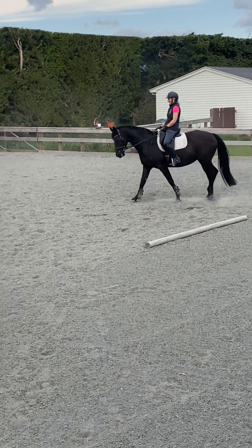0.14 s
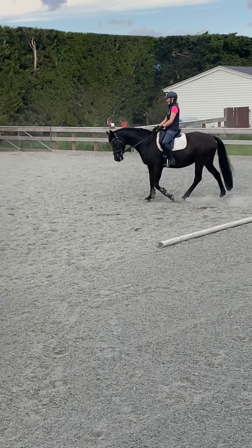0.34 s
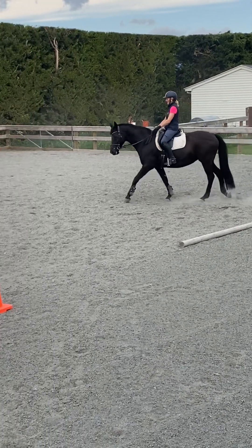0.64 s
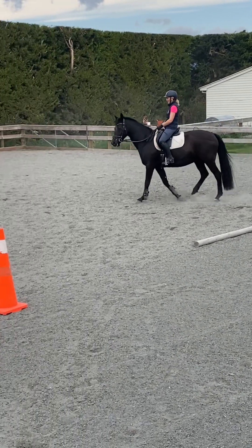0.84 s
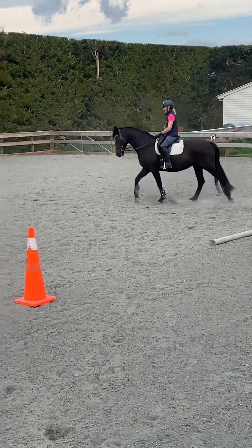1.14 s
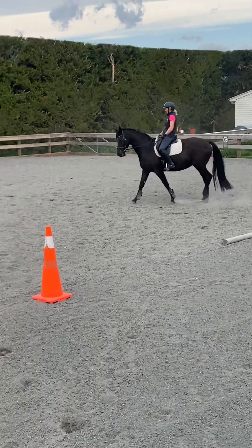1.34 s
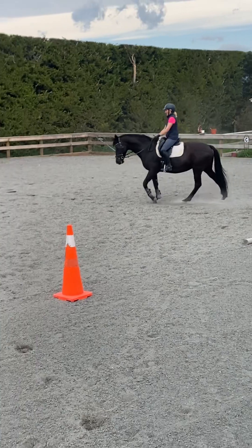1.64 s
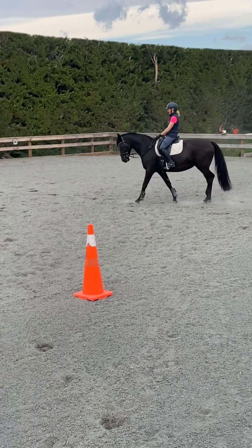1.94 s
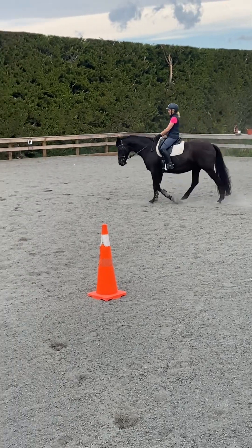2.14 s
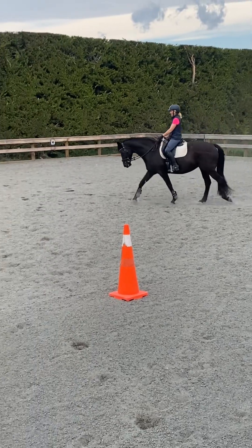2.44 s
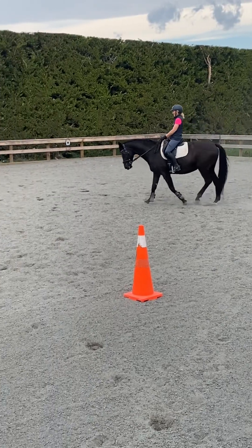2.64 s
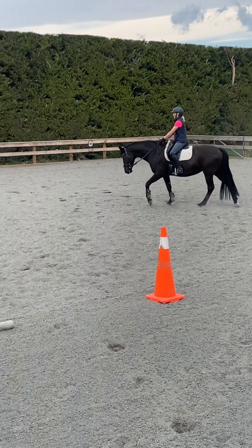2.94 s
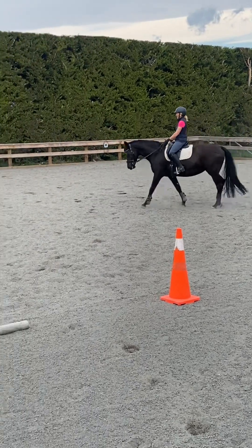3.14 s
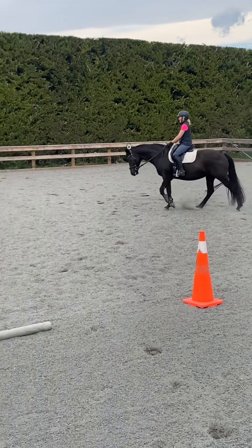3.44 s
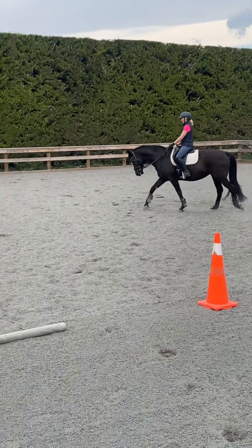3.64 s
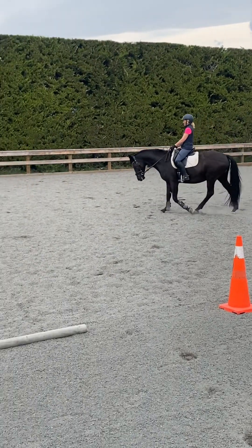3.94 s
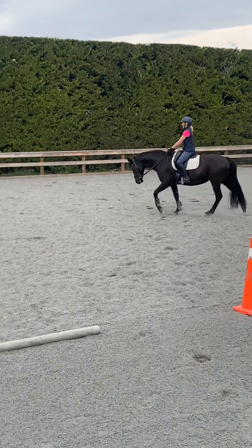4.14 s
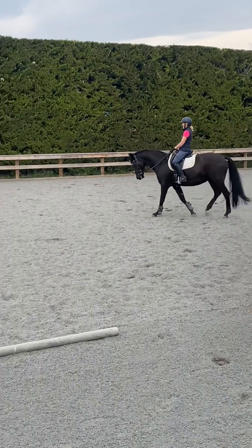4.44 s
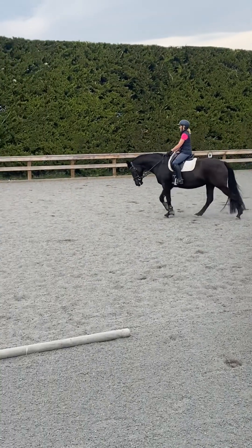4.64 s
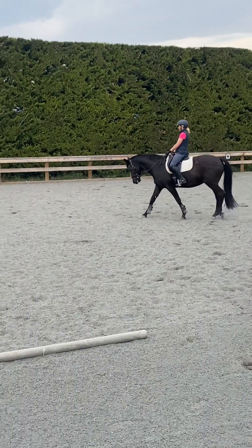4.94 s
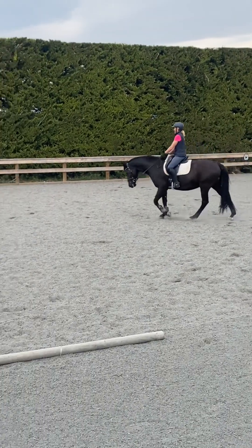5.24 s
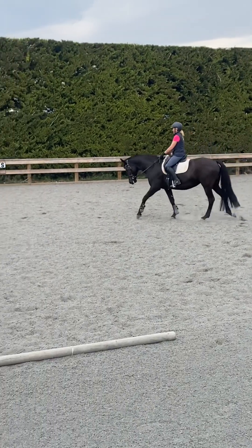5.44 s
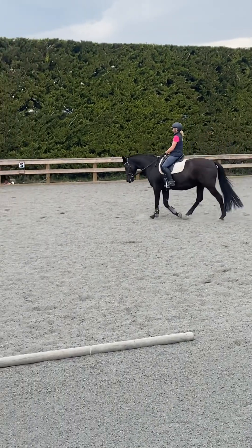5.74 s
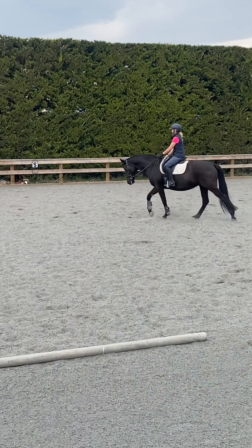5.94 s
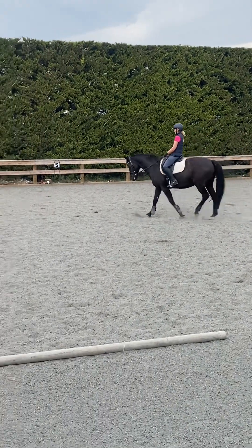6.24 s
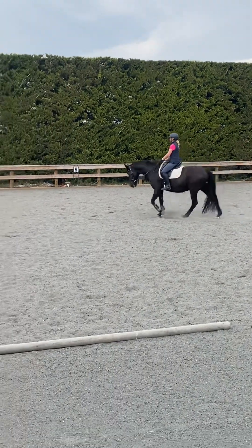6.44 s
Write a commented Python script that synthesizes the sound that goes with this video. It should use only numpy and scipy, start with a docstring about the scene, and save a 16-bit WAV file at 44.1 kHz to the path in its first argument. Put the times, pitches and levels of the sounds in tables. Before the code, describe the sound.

Outdoors at a sand arena, a soft uneven air floor carries a faint, wavering low drone. From 0 to about 1.7 seconds a hoarse, buzzy mid-pitched call swells and fades, while small birds chirp above a distant high twitter. A horse trots some way off: light, irregular hoof ticks within short grainy scuffs, with tiny touches of grit and tack throughout. From 1.8 to 4.1 seconds wind buffets the microphone in deep rumbles and dull falling thumps, strongest around 2.5 to 2.7; a low bending knock comes at 2.25. Bird notes get clearer, with a falling trill near 3.4 and bright chirps around 3.7. A hard clack lands at 3.97. It is calmer until 5.1, with a small knock at 4.7 and a double clack near 5.3. Gusts and heavy thumps return from 5.5 to 6.3, with a hollow plop at 5.95, then birds and quiet air to 6.6.

```python
"""A sand arena in the open, with a hedge: a horse trots some way off.
Hoof falls are ticks inside scuffs of short ringing grains; other ticks of grit and tack are dying noise bursts.
Birds are gliding sine whistles, far ones blur into a wash, and a buzzy call of noise-blurred tones opens.
Gusts buffet the two-port microphone as low noise, with dull thumps of falling pitch.
Clacks, bending knocks, hollow plops, a low drone and an unsteady air floor complete the scene."""
import sys
import numpy as np
from scipy import signal
from scipy.fft import rfft, irfft
from scipy.io import wavfile
from scipy.ndimage import uniform_filter1d

SR = 44100
rng = np.random.default_rng(int(sys.argv[2]) if len(sys.argv) > 2 else 0)


def put_to_file(sound):
    """Save the sound as 16-bit audio at rate SR, in the file named by the first command-line argument."""
    columns = np.atleast_2d(sound).T  # one column per channel
    safe = np.clip(columns, -1, 1)
    whole_steps = np.round(safe * 32767)
    wavfile.write(sys.argv[1], SR, whole_steps.astype(np.int16))


N = 291060
TIME, FREQ = np.arange(N) / SR, np.fft.rfftfreq(N, 1 / SR)  # s, Hz
ALONG = np.linspace(0, 1, 64)  # position along a syllable, start to end
# Hoof falls. Each row: start in seconds, relative tick peak in dB, scuff level in dB, scuff length in seconds
STEPS = [(0.3216, -52, -72, .068), (0.975, -58, -66.5, .07), (1.391, -47, -67, .11),
         (1.544, -48.5, -68, .05), (1.7573, -50, -65, .11), (2.1329, -52.5, -70, .083),
         (2.6382, -53.5, -70, .072), (2.733, -49, -69, .07), (2.9164, -56, -78, .15),
         (3.2485, -49, -65, .05), (3.361, -48, -67, .1), (3.8005, -47, -76, .15), (4.5452, -55, -72, .05),
         (5.05, -60, -73, .06), (5.16, -60, -68, .045), (5.2789, -47, -72.5, .23), (5.756, -52, -73, .03),
         (6.2496, -53, -69, .06), (6.35, -60, -66, .11)]


def amp(db):
    """Decibels to gain: twenty decibels are a factor of ten in amplitude."""
    return 10 ** (np.asarray(db) / 20)


def unit(x):
    """Normalisation by mean power: scales to an rms of one."""
    return x / np.sqrt(np.mean(x ** 2) + 1e-20)


def curve(rows, axis=1):
    """Linear interpolation of one column of a time table at every sample."""
    rows = np.asarray(rows)
    return np.interp(TIME, rows[:, 0], rows[:, axis])


def over_hz(points, hz=FREQ):
    """Interpolation of a spectrum on a log-frequency axis."""
    f, value = np.transpose(points)
    return np.interp(np.log(hz + 1), np.log(f + 1), value)


def colour(x, points):
    """Zero-phase filtering: multiplies the spectrum by a gain curve in dB."""
    gain = amp(over_hz(points, np.fft.rfftfreq(len(x), 1 / SR)))
    return irfft(rfft(x) * gain, len(x))


def noise(points):
    """White noise shaped by a spectrum, with an rms of one."""
    return unit(colour(rng.standard_normal(N), points))


def wander(hz):
    """Gaussian low-pass noise: slow random motion up to about hz."""
    return unit(irfft(rfft(rng.standard_normal(N)) * np.exp(-(FREQ / hz) ** 2), N))


def steadied(x, size):
    """Division by the local rms, over size samples, evens out the chance swells of a noise."""
    power = uniform_filter1d(uniform_filter1d(abs(x) ** 2, size), size)
    return x / np.sqrt(power + 1e-4)


def patchy(x, depth_db, size, count, order=256):
    """Random time-frequency gain: patches size frames long and count bins wide, in frames of order samples."""
    z = signal.stft(x, nperseg=order)[2]
    field = rng.standard_normal(z.shape)
    for _ in range(2):
        field = uniform_filter1d(uniform_filter1d(field, size, 1), count, 0)
    patched = signal.istft(z * amp(depth_db * unit(field)), nperseg=order)[1][:N]
    return unit(patched) * np.std(x)


def add(mix, s, sound):
    """Superposition: mixes a sound in at time s."""
    part = mix[max(round(s * SR), 0):][:len(sound)]
    part += sound[:len(part)]


def echoes(x, t60, delay):
    """Scattering as convolution with sparse, exponentially dying taps of rms gain one."""
    t = np.arange(SR // 2) / SR
    sparse = rng.standard_normal(len(t)) * (rng.random(len(t)) < .05)
    taps = sparse * (t > delay) * amp(-60 * t / t60)
    return signal.fftconvolve(x, taps / np.linalg.norm(taps))[:N]


def ports(x):
    """All-pass phase difference: both ports hear equal magnitudes with a phase that turns with frequency."""
    # Each row: frequency in Hz, phase in radians by which the left port leads
    phase_lead = [(0, 0), (280, 0), (450, -1.2), (690, -2.3), (1210, -3.7), (1640, -6.1), (2580, -5.3),
                  (3750, -6.0), (4570, -5.1), (4900, -3.1), (5250, -.2), (6700, .8), (8000, 1.5),
                  (10500, 2.55), (14000, 3.0)]
    half = np.exp(.5j * over_hz(phase_lead))
    return irfft(rfft(x) * np.array([half, half.conj()]), N)


def air():
    """Broadband ambient noise: the soft outdoor floor, swelling unevenly."""
    # Each row: frequency in Hz, relative density in dB per Hz
    air_spectrum = [(20, -102), (100, -101.5), (180, -99), (300, -93.5), (500, -99), (750, -101),
                    (1000, -107), (1400, -116), (2200, -115), (5000, -119), (7000, -131), (10000, -135),
                    (12500, -142), (16000, -152)]
    # Slow swell. Each row: time in seconds, relative level in dB
    air_swell = [(0, 0), (1, 0), (1.35, 2.5), (1.7, 0), (2.5, -1), (3.2, 1.5), (3.8, 1), (4.1, 3), (4.6, 1),
                 (5, -2), (5.5, .3), (6.6, 0)]
    floor = patchy(colour(rng.standard_normal(N), air_spectrum), depth_db=2.2, size=22, count=6)
    floor = patchy(floor, depth_db=2.6, size=3, count=2, order=2048)
    return floor * np.sqrt(SR / 2) * amp(curve(air_swell) - .5 + 1.3 * wander(9))


def drone():
    """Frequency and amplitude modulation: a far low tone wavers and comes and goes."""
    # Each row: time in seconds, relative level in dB
    drone_level = [(0, -73), (.4, -72), (.75, -63), (1.2, -69), (1.65, -64), (2.3, -74), (4.75, -80),
                   (4.95, -64), (5.1, -74), (5.25, -65), (5.6, -80)]
    hz = 108.7 * (1 + .0264 * wander(9))
    tone = unit(np.sin(2 * np.pi * np.cumsum(hz) / SR))
    return amp(curve(drone_level) - 2 + 2 * wander(7)) * tone


def wind(breeze_flutter_db=-76):
    """Turbulent pressure noise: gusts drive a deep rumble and a higher flutter, over a light breeze."""
    # Spectra. Each row: frequency in Hz, relative level in dB
    rumble_colour, flutter_colour = [(12, -32), (30, -9), (54, 9), (80, 2), (115, -9), (170, -20),
                                     (400, -57), (2000, -120)], [(70, -14.5), (130, 5), (200, -6), (290, -12),
                                                     (420, -32.5), (900, -53), (4000, -110)]
    # Light air between gusts. Each row: time in seconds, relative rumble level in dB
    breeze = [(0, -62), (.33, -68), (.52, -60), (.8, -69), (1.25, -74), (1.7, -69), (4.4, -70), (4.52, -61),
              (4.85, -75), (6.3, -75), (6.43, -61), (6.6, -71)]
    # One curve per gust. Each row: time in seconds, relative strength in dB
    gusts = [
        [(1.72, -62), (1.764, -51), (1.862, -58), (1.896, -40), (1.948, -57), (2.078, -46), (2.12, -62),
         (2.16, -54), (2.22, -61)],
        [(2.22, -61), (2.26, -43), (2.344, -53), (2.42, -41), (2.504, -40), (2.662, -36), (2.678, -41),
         (2.716, -41), (2.74, -60)],
        [(2.74, -61), (2.752, -66), (2.816, -42), (2.86, -40), (2.918, -44), (2.948, -42), (2.984, -44),
         (3.03, -56)],
        [(3.03, -55), (3.04, -60), (3.07, -45), (3.142, -40), (3.19, -59), (3.26, -52), (3.358, -54),
         (3.472, -68), (3.48, -74)],
        [(3.48, -78), (3.51, -50), (3.592, -57), (3.772, -53), (3.818, -43), (3.936, -63), (3.956, -48),
         (4.118, -68), (4.15, -83)],
        [(5.1, -79), (5.198, -60), (5.502, -55), (5.542, -39), (5.6, -46), (5.622, -42), (5.666, -42),
         (5.712, -54), (5.76, -47)],
        [(5.76, -48), (5.836, -50), (5.862, -41), (6.004, -37), (6.03, -46), (6.108, -50), (6.128, -43),
         (6.254, -49), (6.32, -83)],
    ]
    # One value per gust: flutter against rumble in dB
    gust_flutter_db = [-15, -18, -8, -19, -11, -10, -9]
    swell = amp(2.5 * wander(12))
    rumble, flutter = amp(curve(breeze)) * swell, amp(breeze_flutter_db) * swell
    for gust, flutter_db in zip(gusts, gust_flutter_db):
        strength = amp(curve(gust)) * (TIME >= gust[0][0]) * (TIME < gust[-1][0])
        rumble = np.maximum(rumble, strength)
        flutter = np.maximum(flutter, amp(flutter_db) * strength)
    deep = rumble * steadied(noise(rumble_colour), size=1500)
    return deep + flutter * steadied(noise(flutter_colour), size=1000)


def swoop(length, start_hz, end_hz, skew=.84):
    """Falling chirp: a few cycles of pressure that slow down under a smooth window."""
    u = np.linspace(0, 1, int(length * SR))
    hz = end_hz + (start_hz - end_hz) * (1 - u) ** 2
    return np.sin(np.pi * u ** skew) ** 2 * np.sin(2 * np.pi * np.cumsum(hz) / SR)


def thumps(level_db=-1):
    """Eddy impacts: single eddies strike the microphone, and their pressure cycles slow as they pass."""
    # Each row: start in seconds, relative peak in dB, length in seconds, start and end pitch in Hz
    eddies = [(0.515, -44, .016, 344, 135), (1.878, -34.5, .034, 155, 60), (2.456, -29, .032, 105, 58),
              (2.481, -30, .02, 250, 80), (2.506, -34, .018, 200, 100), (2.538, -25.5, .055, 80, 48),
              (2.6, -26, .03, 200, 75), (2.622, -28, .028, 100, 62), (2.642, -23.5, .034, 90, 55),
              (2.692, -30, .028, 90, 55), (2.81, -32.5, .036, 110, 55), (2.84, -32, .03, 170, 65),
              (2.872, -32, .02, 240, 95), (2.897, -35, .019, 280, 110), (2.945, -34, .02, 170, 80),
              (2.992, -44, .01, 544, 210), (3.686, -42, .02, 260, 100), (3.777, -38, .022, 240, 95),
              (3.803, -37, .018, 300, 115), (3.95, -41, .03, 95, 60), (5.527, -35, .012, 400, 170),
              (5.529, -23.5, .038, 135, 56), (5.577, -33, .012, 470, 175), (5.617, -32, .026, 190, 80),
              (5.64, -35, .014, 355, 160), (5.657, -31, .015, 370, 125), (5.858, -29, .045, 90, 52),
              (5.921, -27, .013, 410, 160), (5.93, -25.5, .034, 145, 60), (5.977, -31, .014, 330, 130),
              (5.982, -22.5, .032, 110, 52), (5.999, -39, .012, 420, 230), (6.019, -42, .008, 783, 420),
              (6.054, -34, .022, 248, 95), (6.122, -37, .045, 80, 50), (6.206, -39, .019, 277, 110)]
    out = np.zeros(N)
    for s, db, length, start_hz, end_hz in eddies:
        add(out, s, amp(db + level_db) * swoop(length, start_hz, end_hz))
    return out


def plops():
    """Short tone bursts: small hollow sounds, all on one slightly falling note."""
    # Each row: start in seconds, peak in dB, length in seconds
    hollow_notes = [(0.588, -47.5, .011), (0.648, -48, .007), (1.646, -56.5, .02), (5.948, -39, .01)]
    out = np.zeros(N)
    for s, db, length in hollow_notes:
        add(out, s, amp(db) * swoop(length, start_hz=608, end_hz=500))
    return out


def pocks():
    """Dispersion-like chirp: the treble of a knock arrives first and the pitch bends into a low body."""
    # Each row: start in seconds, peak in dB, length in seconds, start pitch in Hz,
    # seconds in which the pitch halves, skew (lower peaks earlier)
    knocks = [(2.2488, -35.5, .026, 950, .0016, .85), (4.7131, -44, .012, 2500, .0008, .55)]
    out = np.zeros(N)
    for s, db, length, start_hz, halving_s, skew in knocks:
        t = np.arange(int(length * SR)) / SR
        hz = start_hz / (1 + t / halving_s)
        shape = np.sin(np.pi * (t / length) ** skew)
        add(out, s, amp(db) * shape * np.sin(2 * np.pi * np.cumsum(hz) / SR))
    return out


def syllable(length, pitches, trill=0, rasp=0, fall_per_s=0, waver=.009, flutter_db=2):
    """Frequency-modulated whistle: rasp roughens its start, a trill chops it into flicks."""
    trill_flick = 2.3  # each pulse glides this much more steeply than its note
    t = np.arange(int(max(length, .01) * SR)) / SR
    knots = np.arange(0, t[-1] + .01, .005)
    draws = rng.standard_normal((3, 80))[:, :len(knots)]
    wobble, push, hurry = (np.interp(t, knots, row) for row in draws)
    scatter = np.interp(t, np.arange(400) * .0007, rng.standard_normal(400))
    hoarse = scatter * (1 - t / t[-1]) ** 1.5
    glide = np.interp(t / t[-1], ALONG, pitches)
    hz = glide * (1 + waver * wobble + rasp * hoarse)
    shape = signal.windows.tukey(len(t), .22) * amp(flutter_db * push)
    if trill:
        beat = (np.cumsum(trill * (1 + .08 * hurry)) / SR) % 1
        flick = fall_per_s - trill_flick * np.gradient(np.log(glide)) * SR
        hz = hz * (1 + flick * (.5 - beat) / trill)
        shape = shape * np.sin(np.pi * beat) ** 6
    return unit(shape * np.sin(2 * np.pi * np.cumsum(hz) / SR))


def far_birds(count=480, flock_db=-2.5, wash_db=-7.5):
    """Incoherent superposition: many faint syllables, mostly falling, blur into a soft high wash."""
    # Each row: time in seconds, relative level in dB
    chorus_level = [(0, -73), (.85, -67.5), (1.2, -73.5), (1.7, -69.5), (2.85, -68), (3.9, -71),
                    (4.2, -67.5), (5.05, -76), (5.25, -69), (6.6, -70)]
    # Each row: frequency in Hz, relative level in dB
    chorus_colour = [(1000, -40), (1600, -15), (2100, -6), (2600, 0), (3100, 3), (4300, 3), (5300, -1),
                     (5900, -19), (7000, -47), (12000, -79)]
    song = np.zeros(N)
    for k, (when, long, high, fall, arch, loud, kind) in enumerate(rng.random((count, 7))):
        slope = (.65 * fall - .15) * (.5 - ALONG) + .22 * (arch - .5) * np.sin(np.pi * ALONG)
        hz = (2600 + 2700 * high ** 1.3) * (1 + slope)
        trill = (kind < .3) * (60 + 300 * kind)
        start = (k + 3 * when - 2) / count * N / SR
        add(song, start, amp(8 * loud) * syllable(.02 + .08 * long ** 2, hz, trill, .04 * kind))
    flock = unit(colour(song + .6 * echoes(song, t60=.2, delay=.003), chorus_colour))
    wash = patchy(noise(chorus_colour), depth_db=4, size=8, count=4)
    return amp(curve(chorus_level)) * (amp(flock_db) * flock + amp(wash_db) * wash)


def buzzy_call():
    """Narrow-band noise: gliding tones, blurred by random modulation, stand in a band of rasp."""
    # Each row: time in seconds, relative level of the rasp in dB
    buzz_level = [(0, -78), (.17, -66.5), (.33, -60.5), (.5, -58), (.68, -57.5), (.85, -57), (1.1, -63),
                  (1.33, -59), (1.55, -65.5), (1.8, -84)]
    # Each row: frequency in Hz, relative level in dB
    buzz_rasp = [(500, -30), (800, -10), (1050, 8), (1300, -2.5), (1520, -5), (1750, -4), (2080, -1.5),
                 (2300, -13), (2900, -24), (6000, -70)]
    # One curve per ridge. Each row: time in seconds, pitch in Hz, level in dB
    buzz_ridges = [
        [(.05, 1560, -86), (.18, 1590, -72), (.3, 1670, -70), (.38, 1735, -63.5), (.5, 1768, -62),
         (.6, 1765, -64), (.78, 1740, -80)],
        [(.3, 1530, -80), (.65, 1540, -73), (.8, 1530, -65), (1.05, 1490, -71), (1.22, 1505, -68),
         (1.55, 1470, -81)],
        [(.25, 2080, -82), (.55, 2080, -73), (.95, 2040, -74), (1.55, 2030, -81)],
    ]
    blur_hz = 62
    rasp = patchy(noise(buzz_rasp), depth_db=3, size=3, count=2, order=2048)
    call = amp(curve(buzz_level) - 2.3) * rasp
    for ridge in buzz_ridges:
        fuzz = steadied(wander(blur_hz) + 1j * wander(blur_hz), size=6000)
        carrier = np.exp(2j * np.pi * np.cumsum(curve(ridge)) / SR)
        tone = unit((carrier * fuzz).real)
        sounding = (TIME > ridge[0][0]) * (TIME < ridge[-1][0])
        call = call + amp(curve(ridge, axis=2)) * sounding * tone
    return call


def chirps():
    """Resonance-shaped pitch curve: a quick flick up to a top, then a fall that levels off."""
    # Each row: time of the top in seconds, tail in seconds, level in dB, top pitch in Hz,
    # mean trill pulses per second or 0
    chirp_notes = [(0.112, .045, -70, 5000, 150), (0.268, .04, -72, 4700, 130), (0.778, .065, -67, 4400, 0),
                   (1.915, .03, -71, 4100, 0), (2.032, .115, -68, 4450, 80), (3.254, .062, -59, 4600, 0),
                   (3.61, .032, -64, 5600, 0), (3.682, .048, -57, 5650, 0), (3.685, .045, -65, 6000, 140),
                   (4.279, .085, -64.5, 4350, 0), (4.622, .07, -71, 4400, 0), (5.112, .028, -69, 4600, 0),
                   (5.165, .02, -72, 4400, 130), (5.605, .065, -67, 4400, 0), (6.095, .062, -64, 4300, 0),
                   (6.137, .062, -66, 4550, 0)]
    lead_s, turn_s = .027, .016  # rise before the top, half width of the top
    tail_share = .645  # pitch toward which the fall levels off, over top pitch
    song = np.zeros(N)
    for s, tail, db, top_hz, trill in chirp_notes:
        length = lead_s + tail
        flick = 1 / (1 + ((ALONG * length - lead_s) / turn_s) ** 2)
        hz = top_hz * (tail_share + (1 - tail_share) * flick)
        chirp = syllable(length, hz, trill, rasp=.085, fall_per_s=24)
        swell = np.minimum(np.arange(len(chirp)) / SR / .03, 1)  # full just after the top
        add(song, s - lead_s, amp(db) * swell * chirp)
    return song


def slurs():
    """Decelerating glide: the pitch moves quickly at first and settles on a note."""
    # Each row: start in seconds, length in seconds, level in dB, start and end pitch in Hz
    slur_notes = [(0.17, .085, -76, 4380, 3950), (0.955, .145, -71, 3100, 2880),
                  (1.55, .17, -70.5, 4500, 3900), (1.775, .04, -73, 3450, 2850),
                  (1.86, .035, -71, 3500, 2550), (2.09, .11, -78, 5600, 5000),
                  (2.195, .04, -71, 3600, 2850), (2.26, .13, -76, 2950, 2550),
                  (2.59, .09, -77.5, 3120, 2250), (2.68, .035, -73, 3600, 1700),
                  (2.715, .1, -76, 2280, 1830), (3.16, .04, -73, 3300, 1900), (3.38, .13, -71, 3520, 3020),
                  (3.582, .012, -64, 3600, 4550), (3.765, .095, -65, 4900, 3680),
                  (3.9, .07, -75, 5650, 5250), (4.0, .15, -73, 3430, 3180), (4.68, .075, -70, 4350, 4700),
                  (4.975, .075, -71, 3650, 3150), (4.828, .042, -67, 3550, 4330),
                  (5.18, .15, -76, 3270, 2890), (5.68, .04, -73, 2900, 4150)]
    song = np.zeros(N)
    for s, length, db, start_hz, end_hz in slur_notes:
        hz = end_hz + (start_hz - end_hz) * (1 - ALONG) ** 1.8
        add(song, s, amp(db) * syllable(length, hz))
    return song


def dives():
    """Accelerating glide: notes start level and then dive or climb, some trilled."""
    # Each row: start in seconds, length in seconds, level in dB, start and end pitch in Hz,
    # mean trill pulses per second or 0
    dive_notes = [(0.015, .055, -74, 4200, 3100, 110), (0.42, .07, -69, 4300, 3700, 150),
                  (0.515, .025, -71, 4150, 3200, 0), (0.6, .022, -68, 3500, 2200, 0),
                  (0.755, .072, -65, 4900, 4050, 0), (0.885, .025, -71, 3350, 2400, 0),
                  (1.755, .045, -72, 4450, 3700, 0), (1.957, .027, -71, 6200, 5600, 75),
                  (1.992, .022, -59, 5420, 4880, 0), (2.005, .035, -70, 4800, 4200, 80),
                  (2.352, .03, -70, 4400, 3700, 0), (2.412, .033, -70, 5500, 3700, 75),
                  (2.44, .07, -67, 3720, 3800, 80), (2.505, .035, -70, 3900, 2900, 0),
                  (2.59, .11, -70, 4250, 4350, 45), (2.908, .095, -67, 3950, 2100, 55),
                  (3.022, .022, -70, 2100, 4000, 0), (3.053, .022, -62, 4300, 2500, 0),
                  (3.19, .038, -69, 3800, 4700, 0), (3.205, .045, -67, 2000, 4400, 0),
                  (3.424, .135, -61.5, 5300, 2100, 61), (4.045, .075, -72, 2900, 4300, 58),
                  (4.385, .03, -71, 3900, 2800, 0), (4.745, .085, -66, 4780, 3450, 0),
                  (5.005, .04, -69, 4580, 3980, 0), (5.72, .022, -73, 5400, 5100, 0),
                  (5.775, .055, -76, 3400, 2400, 0), (5.8, .025, -75, 6150, 5000, 0),
                  (5.845, .032, -71, 3800, 2600, 0), (5.995, .028, -71, 3800, 2600, 0),
                  (6.243, .024, -71, 3650, 2700, 0), (6.33, .032, -72, 3700, 2800, 0),
                  (6.575, .028, -69, 5300, 5300, 70)]
    song = np.zeros(N)
    for s, length, db, start_hz, end_hz, trill in dive_notes:
        hz = start_hz + (end_hz - start_hz) * ALONG ** 1.8
        add(song, s, amp(db) * syllable(length, hz, trill, rasp=.025, fall_per_s=13))
    return song


def arches():
    """Parabolic glide: thin, slightly hoarse notes rise to a top midway and sag again."""
    # Each row: start in seconds, length in seconds, level in dB, top pitch in Hz,
    # share by which the ends sag, mean trill pulses per second or 0
    arch_notes = [(0.57, .07, -78, 5700, .05, 0), (1.235, .07, -75, 3850, .12, 0),
                  (1.33, .19, -75, 5600, .08, 0), (2.18, .11, -68, 4820, .02, 0),
                  (2.77, .09, -70, 3600, .09, 0), (3.075, .28, -82, 7650, .15, 190),
                  (3.32, .04, -71, 3650, .2, 0), (3.648, .042, -66, 6350, .1, 130),
                  (4.26, .19, -78, 5400, .05, 85), (4.88, .13, -73, 5800, .09, 0),
                  (4.885, .1, -68, 5850, .09, 75), (5.46, .12, -73, 4200, .06, 120),
                  (5.75, .035, -69, 4220, .08, 0), (5.88, .06, -78, 5450, .07, 0),
                  (5.97, .05, -78, 6030, .07, 0), (6.155, .075, -74, 5400, .06, 0),
                  (6.49, .08, -70, 3530, .2, 0), (6.5, .065, -70, 4200, .08, 0)]
    song = np.zeros(N)
    for s, length, db, top_hz, sag, trill in arch_notes:
        hz = top_hz * (1 - sag * (2 * ALONG - 1) ** 2)
        add(song, s, amp(db) * syllable(length, hz, trill, rasp=.035))
    return song


def near_birds():
    """Direct and scattered sound: four kinds of syllable, then the leaves and the hedge behind them."""
    song = chirps() + slurs() + dives() + arches()
    song = song + amp(-8) * echoes(song, t60=.05, delay=.002)  # leaves
    return song + amp(-9) * echoes(song, t60=.35, delay=.006)  # hedge


def burst(decay, points, size=2048):
    """Impulsive noise: a tiny crumbly crack decays exponentially from a peak of one."""
    t = (np.arange(size) - size // 16) / SR  # lead-in for the filter, cut off afterwards
    crumbs = rng.standard_normal(size) * rng.exponential(1, size) ** .5
    crack = colour(crumbs * (t >= 0) * np.exp(-abs(t) / decay), points)[size // 16:]
    return crack / abs(crack).max()


def clacks(spread_db=-4):
    """Impact and modal decay: a crack, hollow body and ring, struck twice; reflections differ by port."""
    # Each row: start in seconds, crack level in dB, frequency in Hz above which the crack fades,
    # body level in dB, ring level in dB, ring pitch in Hz
    hard_knocks = [(3.968, -36, 7200, -44.5, -45, 2330), (5.279, -50, 8500, -66, -52, 2900),
                   (5.3303, -44, 3800, -47, -42.5, 2850)]
    # Each row: frequency in Hz, relative level in dB
    clack_colour = [(100, -8), (350, -2), (900, 1), (1500, 1.5), (2400, 0), (3500, -2), (7000, 1),
                    (15000, -16)]
    # Body modes. Each row: frequency in Hz, relative level in dB, 60 dB decay time in seconds
    body_modes = [(285, -1, .03), (740, 0, .015), (1200, -6.5, .007)]
    out, t = np.zeros(N), np.arange(2048) / SR
    for s, crack_db, corner_hz, body_db, ring_db, ring_hz in hard_knocks:
        points = [(hz, level - 10 * np.log10(1 + (hz / corner_hz) ** 4)) for hz, level in clack_colour]
        add(out, s, amp(crack_db) * burst(.0012, points))
        add(out, s, amp(ring_db - 60 * t / .012) * np.sin(2 * np.pi * ring_hz * t))
        for k, (hz, db, t60) in enumerate(body_modes):
            add(out, s, (-1) ** k * amp(body_db + db - 60 * t / t60) * np.sin(2 * np.pi * hz * t))
    add(out, .0033, amp(-6) * out)  # second strike
    spread = amp(spread_db) * echoes(out, t60=.008, delay=0)
    return out + .16 * echoes(out, t60=.12, delay=.004) + np.array([[1], [-1]]) * spread


def ticks(level_db=4.5):
    """Contact transients: small touches, dull or bright by spectral tilt, with a faint scatter after."""
    # Other ticks of grit and tack, between and during the steps.
    # Each row: start in seconds, relative peak in dB, brightness in dB per octave
    other_ticks = [(0.183, -52, 3.5), (0.5473, -53, -4.5), (0.9316, -57, 6), (1.169, -56.5, 6),
                   (1.6227, -56, -.5), (1.6522, -58, -4), (1.8133, -54, 0), (2.393, -50, 8),
                   (3.2046, -42.5, 2.5), (2.8377, -56, 0), (4.1205, -52, -1), (4.149, -58, 2),
                   (5.1765, -50, 3), (5.0461, -50, 1.5), (5.308, -56, 6), (0.243, -60, 3), (0.828, -61, 3),
                   (1.113, -59, 5), (1.94, -59, 2), (2.51, -60, 2), (3.027, -59, 2), (1.41, -54, 0),
                   (1.865, -59, -4), (2.15, -58, 2), (3.33, -55, 5), (3.595, -58, -2), (3.846, -57, 3),
                   (4.015, -59, 2), (4.567, -59, 2), (4.7128, -54, -6), (5.2828, -48, 3), (5.505, -60, 2),
                   (6.198, -50, 7), (6.538, -59, 1)]
    # Each row: frequency in Hz, relative level in dB
    tick_colour = [(300, -48), (1000, -33), (2000, 4), (3500, 2.5), (6500, 0), (9500, 3), (12000, 4),
                   (15000, -22)]
    hoof_ticks = [(s, db, 1.5) for s, db, _, _ in STEPS]
    variety_db = 2.2  # random differences in colour
    out = np.zeros(N)
    for s, db, brightness in other_ticks + hoof_ticks:
        points = []
        for hz, level in tick_colour:
            tilt = brightness * np.log2(hz / 8000)
            points.append((hz, level + tilt + variety_db * rng.standard_normal()))
        add(out, s + .0005, amp(db + level_db) * burst(.003, points))
    return out + .6 * echoes(out, t60=.09, delay=.002)


def grit(per_s, spread_db, count=16):
    """Random impulses excite damped resonators: uneven grains, each a brief ring at one of count pitches."""
    sizes = amp(spread_db * np.minimum(rng.exponential(1, N), 4))
    clicks = rng.choice([-1, 1], N) * (rng.random(N) < per_s / SR) * sizes
    kind, out = rng.integers(0, count, N), np.zeros(N)
    t = np.arange(96) / SR
    for k, hz in enumerate(np.linspace(1500, 14000, count)):
        ring = np.exp(-t / .00016) * np.sin(2 * np.pi * hz * t)
        out += np.convolve(clicks * (kind == k), ring)[:N]
    return out


def sand(grains_per_s=4000, pebbles_per_s=13, settle_db=-9.5, settle_s=.25):
    """Granular noise: grains scatter under each hoof, rain back and trickle; a larger one clicks at times."""
    # Each row: frequency in Hz, relative level in dB
    sand_colour = [(1000, -16), (3000, -4), (5500, -5.5), (8000, 0), (11500, -5.5), (13500, -21),
                   (16000, -16)]
    # Loose grains settling. Each row: time in seconds, relative level in dB
    trickle = [(0, -106), (1.4, -93), (2.3, -97), (2.8, -80), (3.4, -80), (3.7, -88.5), (4.3, -100),
               (5.3, -90.5), (5.6, -82), (6.6, -98)]
    clumps = amp(4 * wander(24))
    level = amp(curve(trickle) - 4.5) * clumps
    for s, _, db, length in STEPS:
        u = np.linspace(0, 1, int(length * SR))
        # the sand is brushed just before the hoof lands
        add(level, s - .004, amp(db) * np.sin(np.pi * np.sqrt(u)))
    grains = unit(colour(grit(grains_per_s, spread_db=4), sand_colour))
    scuffs = level * patchy(grains, depth_db=4.5, size=2, count=12)
    settling = amp(settle_db) * echoes(scuffs, t60=settle_s, delay=.01)
    pebbles = (rng.random(N) < pebbles_per_s / SR) * amp(-61 - 22 * rng.random(N))
    return scuffs + settling + signal.fftconvolve(pebbles, burst(.0023, sand_colour))[:N]


def scene():
    """Superposition at two ports; wind, air and scattered sound differ a little between them."""
    outdoors = air() + drone() + far_birds() + buzzy_call() + near_birds() + ticks() + sand()
    common = wind() + thumps() + pocks() + plops() + amp(-1) * air()
    scattered = echoes(outdoors, t60=.014, delay=.001)
    diffuse = amp(-12) * wind() + amp(-4.5) * air() + amp(-17) * scattered
    return ports(outdoors) + clacks() + common + np.array([[1], [-1]]) * diffuse


def record(dry):
    """Linear-phase low-pass: the recorder's band limit at 15.8 kHz."""
    lowpass = signal.firwin(511, 15800, window=("kaiser", 9), fs=SR)
    return signal.oaconvolve(dry, lowpass[None], "same")


dry = scene()
out = record(dry)
put_to_file(out)
```